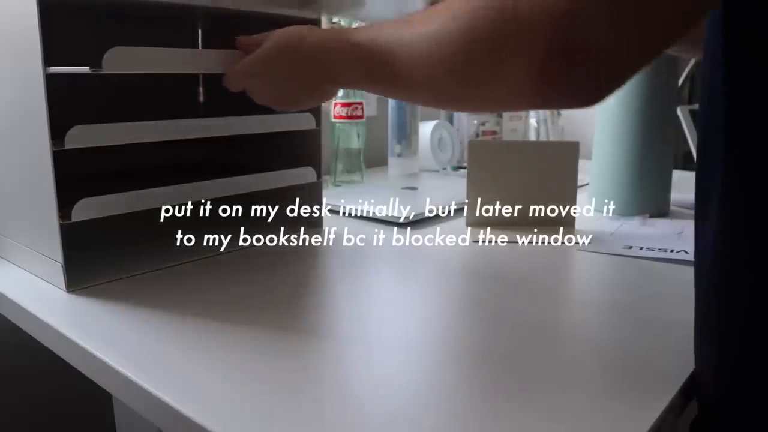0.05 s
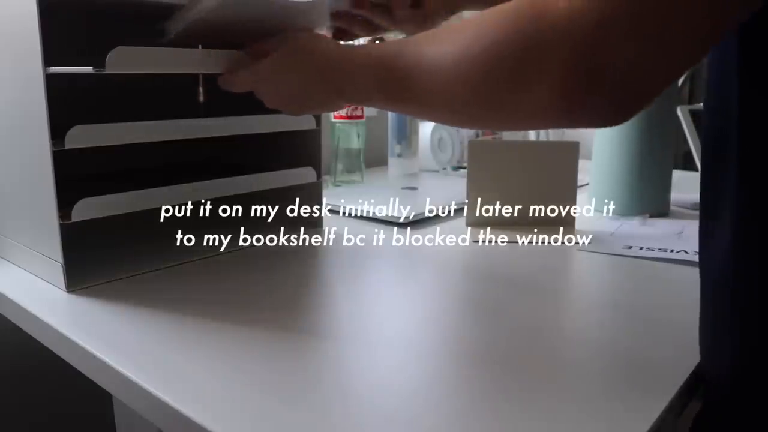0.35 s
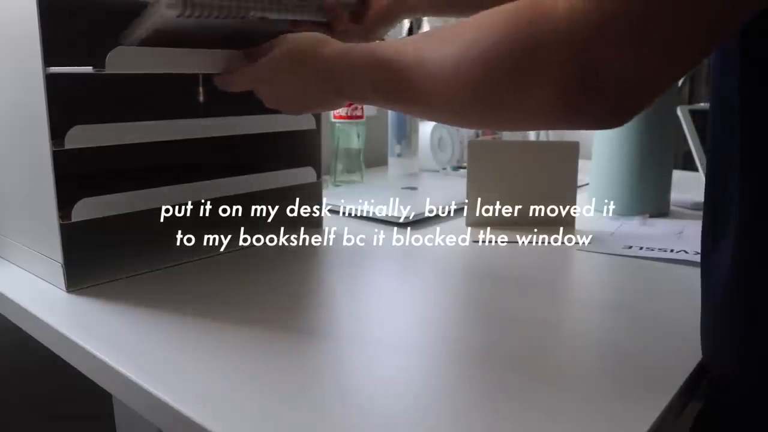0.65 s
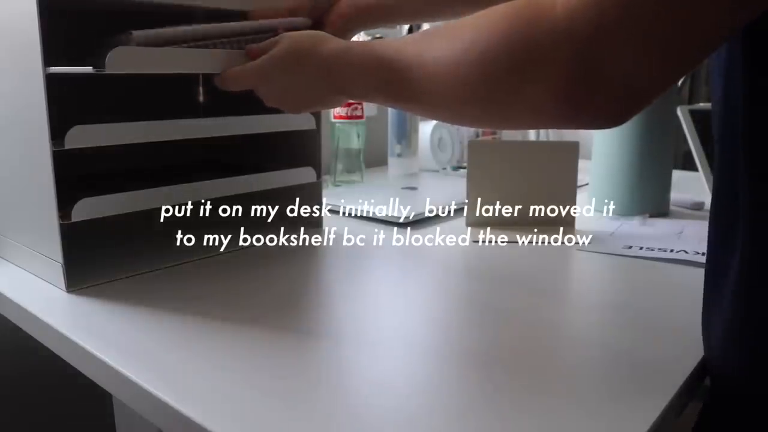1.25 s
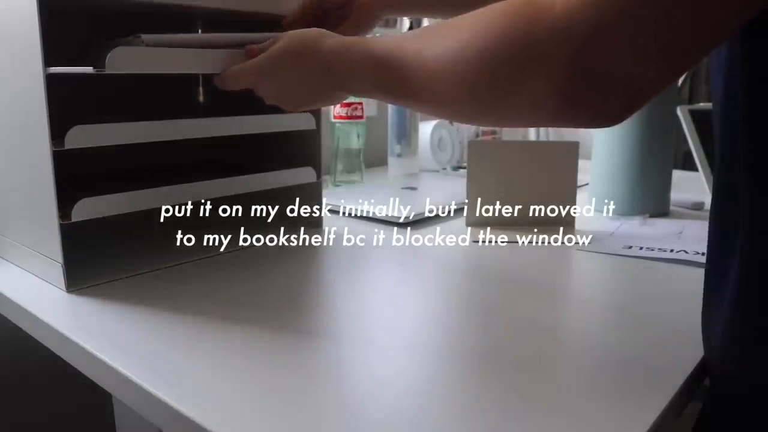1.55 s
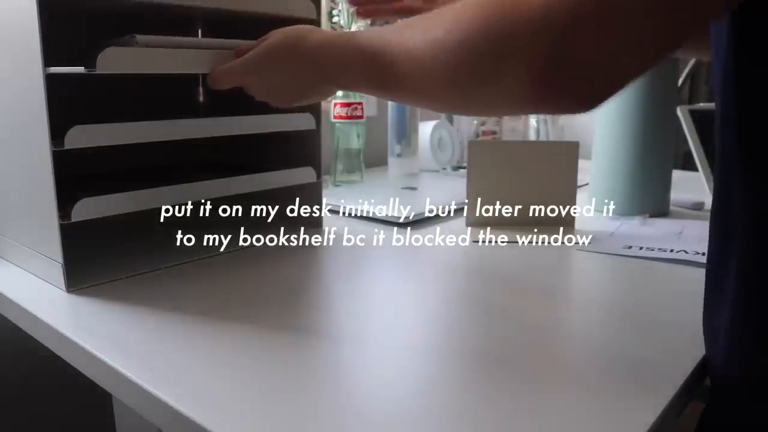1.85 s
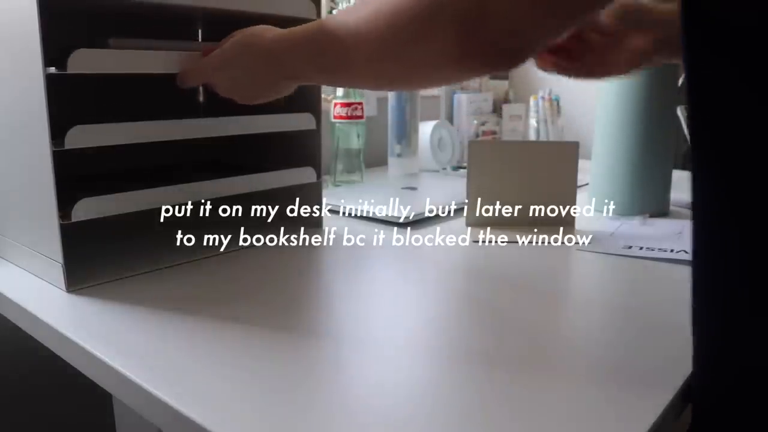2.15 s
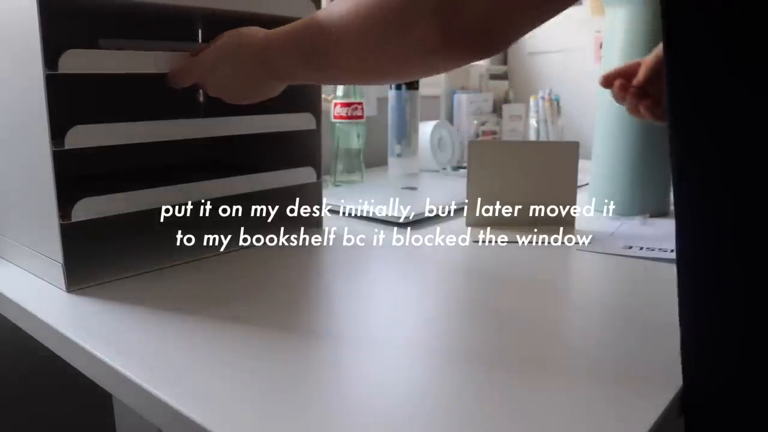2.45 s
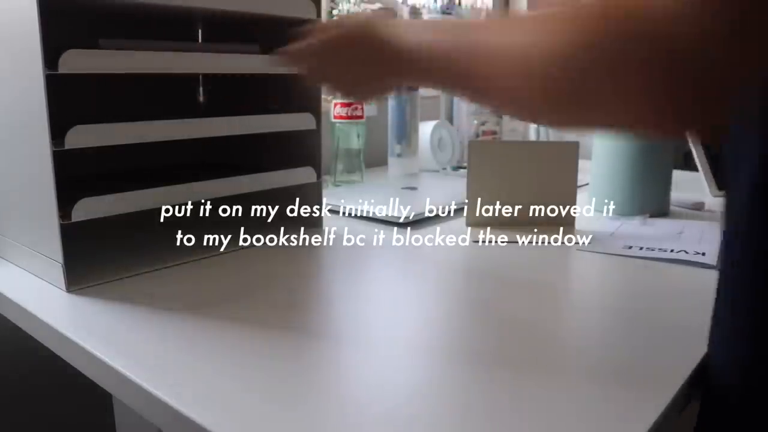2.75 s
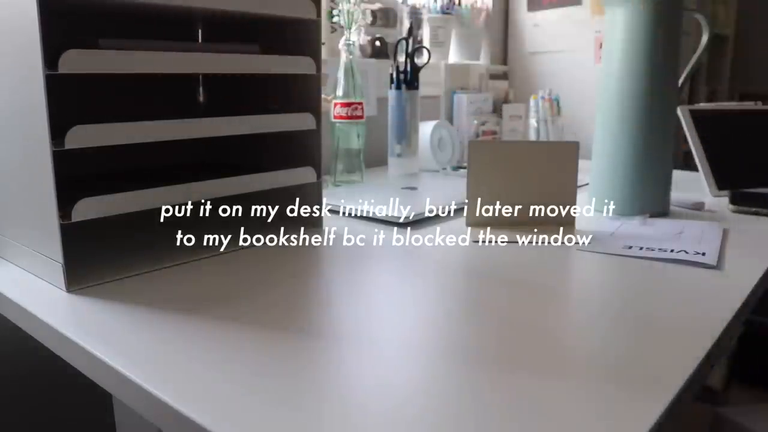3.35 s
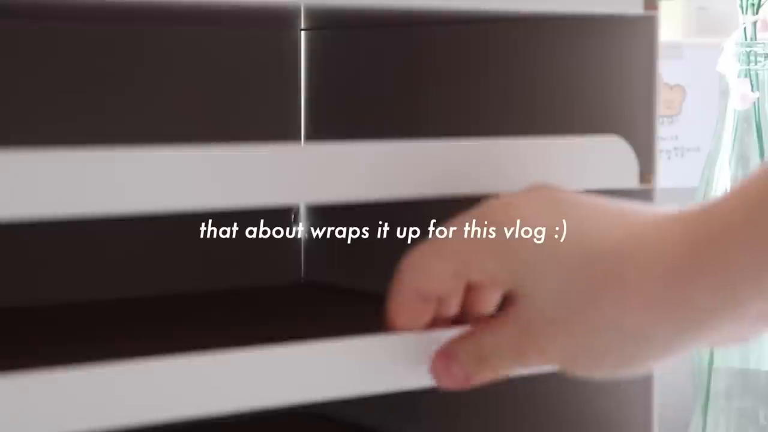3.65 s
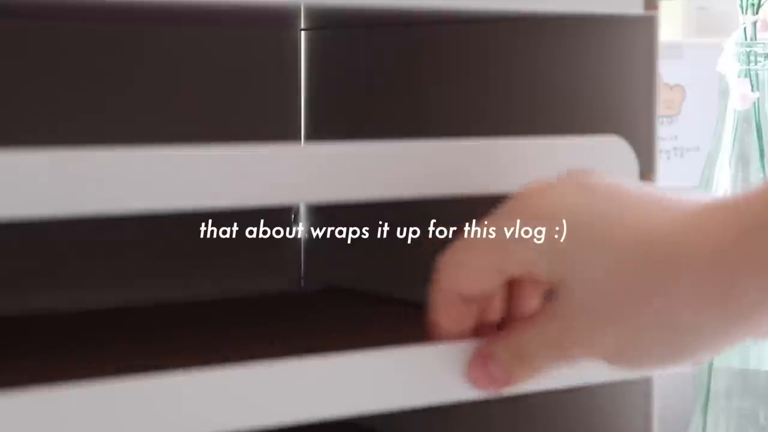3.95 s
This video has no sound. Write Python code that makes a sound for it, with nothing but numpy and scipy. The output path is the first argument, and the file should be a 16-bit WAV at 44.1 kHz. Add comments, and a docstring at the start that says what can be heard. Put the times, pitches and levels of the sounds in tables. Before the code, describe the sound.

A tray scrapes out of a hollow desk organizer. Paper brushes softly, a notebook clacks onto the tray, and it slides shut with a knock. Then a tray slides again, closer, over a faint fan hum in a quiet room.

```python
"""A thin tray is drawn out of a desktop organizer: friction hisses with its speed and rings the hollow case.
A notebook is moved, its binding ticks, paper and sleeve brush past, and it drops on the tray with a clack.
The tray is pushed home with a knock, and there is a faint rumble as the person steps away.
Then, from closer up, a tray is gripped and slid again, chattering on its runners.
All along, a fan hums in the quiet room."""
import sys
import numpy as np
from scipy import signal
from scipy.fft import rfft, irfft
from scipy.io import wavfile
from scipy.ndimage import uniform_filter1d

SR = 44100
rng = np.random.default_rng(int(sys.argv[2]) if len(sys.argv) > 2 else 0)


def pcm_store(signal):
    """Save signal as 16-bit PCM."""
    levels = np.round(np.clip(np.atleast_2d(signal), -1, 1) * 32767)
    wavfile.write(sys.argv[1], SR, levels.astype(np.int16).T)


N = 176400
T, HZ = np.arange(N) / SR, np.maximum(np.arange(N // 2 + 1) * SR / N, 1)
FAR_LAG_S = .000065   # the right microphone hears the far tray later


# Each row: time in seconds, then runner hiss, tray rasp and case drone in dB, before the boosts below.
PULL_LEVELS = [(0.0, -47.5, -34.5, -24.5), (0.024, -50.5, -35, -35.5), (0.136, -58.5, -37.5, -45.5),
               (0.17, -60, -42, -37.5), (0.2, -59, -39.5, -40.5), (0.234, -66, -41, -39),
               (0.36, -89, -62.5, -63)]
# The tone of the rasp. Each row: frequency in Hz, level in dB.
PULL_RASP = [(200, -16), (340, 1), (600, -5.5), (950, -.5), (1400, -9), (2000, -13), (2800, -19),
             (4000, -39)]

def pull_out():
    """The tray starts with a jerk and fades as it slows."""
    return slide(PULL_LEVELS, PULL_RASP, hiss_boost_db=4.0, rasp_boost_db=1.1, drone_boost_db=-2.0,
                 rough_db=0.5, lag_s=FAR_LAG_S / 2, rasp_pan_db=0.5)


# Each row: time in seconds, then hiss, rasp and drone in dB, before the boosts below.
PUSH_LEVELS = [(1.785, -61, -47, -44), (1.84, -46, -39, -35), (1.956, -35.5, -36, -44.5),
               (1.978, -34.5, -33.5, -33.5), (2.085, -35.5, -34.5, -37.5), (2.185, -40, -37, -36.5),
               (2.266, -42.5, -36.5, -42.5), (2.345, -49.5, -35.5, -34.5)]
# Each row: frequency in Hz, level of the rasp in dB.
PUSH_RASP = [(130, -14), (400, 3), (700, -3), (1300, 1.5), (1550, -3), (2000, -0.5), (3000, -9.5),
             (4500, -16)]

def push_home():
    """The loaded tray slides back in, hissing most where it moves fastest."""
    return slide(PUSH_LEVELS, PUSH_RASP, hiss_boost_db=5.0, rasp_boost_db=0.56, drone_boost_db=0.0,
                 rough_db=0.5, lag_s=FAR_LAG_S, rasp_pan_db=0.0)


# Each row: time in seconds, then hiss, rasp and drone in dB, before the boosts below.
CLOSE_LEVELS = [(3.685, -65, -39.5, -30), (3.705, -52, -37.5, -30.5), (3.763, -49, -35, -32.5),
                (3.809, -71, -43.5, -33.5), (3.83, -62, -44, -32.5), (3.865, -47, -34.5, -35),
                (3.919, -42, -32.5, -32.5), (3.951, -39, -33, -23.5), (4.0, -36.5, -36, -23)]
# Each row: frequency in Hz, level of the rasp in dB.
CLOSE_RASP = [(120, -0.5), (440, 3), (600, -4), (780, 3.5), (1400, -2.5), (2100, -3.5), (3100, -9),
              (4500, -20)]

def close_slide():
    """A nearby tray slides, hesitates and slides on, chattering."""
    return slide(CLOSE_LEVELS, CLOSE_RASP, hiss_boost_db=6.0, rasp_boost_db=0.5, drone_boost_db=-3.5,
                 rough_db=0.0, lag_s=0, rasp_pan_db=-0.2, chatters=True)


# The tone of the runners' hiss. Each row: frequency in Hz, level in dB.
RUNNER_HISS = [(1000, -16), (2000, 3.5), (3000, 3), (4300, 0), (5500, -3), (7500, -4), (11000, -8.5),
               (15500, -12)]

def slide(levels, rasp_tone, hiss_boost_db, rasp_boost_db, drone_boost_db,
          rough_db, lag_s, rasp_pan_db, chatters=False):
    """Tiny slips hiss on the runners, rasp in the tray and keep the case droning."""
    times, *curves = np.transpose(levels)
    fade_in_s, release_s = 0.027, 0.034
    fade = np.clip(1 + (T - times[0]) / fade_in_s, 0, 1)
    fade *= np.exp(-np.maximum(T - times[-1], 0) / release_s)
    hiss_gain, rasp_gain, drone_gain = [fade * from_db(np.interp(T, times, db)) for db in curves]
    # Friction varies quickly with the surface, slowly with the hand's pressure.
    grain = unit_power(from_db(rough_db * (drift(rate_hz=250) + drift(rate_hz=34.8))))
    drone = from_db(drone_boost_db) * case_drone()
    if chatters:
        drone = drone + chatter()
    tray = tray_response()
    hiss = from_db(hiss_boost_db) * hiss_gain * noise(colour(RUNNER_HISS) * tray, lag_s=lag_s)
    rasp = from_db(rasp_boost_db) * rasp_gain * noise(colour(rasp_tone) * tray, lag_s=lag_s)
    return grain * (hiss + rasp * pan(rasp_pan_db)) + drone_gain * drone


# The notes at which case and tray ring. Each row: pitch in Hz, relative level in dB when struck,
# the same when rubbed, ring time in seconds (the time to fade by 60 dB, called t60).
CASE_NOTES = [(218.5, -5.5, -3.5, 0.23), (257.5, 2, 1, .22), (276.5, -4, 1, 0.22),
              (341.4, -1.5, -6.5, 0.27), (405, -19, -20, 0.28), (476.3, -11.5, -12.5, 0.31),
              (629, -13.5, -20.5, 0.34), (721, -26, -20.5, 0.19), (915, -30, -17, 0.13),
              (991.4, -5, -17, 0.23), (1292, -15.5, -17.5, 0.33), (1658, -14, -24, 0.21),
              (1896, -13.5, -20.5, 0.2)]

def case_drone():
    """Hundreds of tiny random slips a second keep the hollow case ringing at an even level."""
    slips_per_s, spread_db = 700, 0.5
    slips = (rng.random(N) < slips_per_s / SR) * rng.choice([-1, 1], N)
    slips = slips * from_db(spread_db * rng.standard_normal(N))
    case = cut_bass(sum((-1) ** k * from_db(rubbed_db) * ring(slips, hz, t60)
                        for k, (hz, _, rubbed_db, t60) in enumerate(CASE_NOTES)))
    return case / np.sqrt(uniform_filter1d(case ** 2, size=2000) + 1e-12)


# The pitches the tray favours. Each row: frequency in Hz, width in Hz, lift in dB.
TRAY_PEAKS = [(341, 9.9, 6.5), (711, 23, 7.5), (922.6, 22.5, 10.5), (1387, 44, 5.5), (1988, 57, 6.5),
              (3020, 200, 3.5), (4500, 220, 4.5)]

def tray_response():
    """The tray shapes the friction noise with a few strong resonances among many weak ones."""
    peaks = 1 + sum((from_db(db) - 1) / (1 + (2 * (HZ - hz) / width) ** 2)
                    for hz, width, db in TRAY_PEAKS)
    weak_peaks = unit_power(np.abs(rfft(rng.standard_normal(N) * decay(T, t60=0.19))))
    return peaks * (1 + 0.58 * (weak_peaks - 1))


def chatter():
    """The close tray chatters on its runners at the pitch of the case."""
    start_s, pitch_hz = 3.735, 271.5
    fade_in = np.clip((T - start_s) / 0.027, 0, 1)
    gain = fade_in * from_db(-3 + 2.0 * drift(rate_hz=40))
    return gain * np.sqrt(2) * np.sin(2 * np.pi * pitch_hz * T + .5 * drift(rate_hz=17))


# Each row: start in seconds, crack in dB, frequency in Hz above which crack and echo are dulled,
# crack fade time in seconds, room echo in dB, case ring in dB, thud in dB.
KNOCKS = [(1.6926, -23.5, 4540, 0.031, -50, -35, -53), (1.700, -27.5, 1060, 0.22, -30.5, -46, -22),
          (1.748, -29.5, 650, 0.13, -38, -43, -17.5), (1.792, -30.5, 800, 0.077, -41, -51, -32),
          (2.352, -26.5, 7140, 0.083, -26, -22.5, -14.5), (2.3632, -26, 6040, 0.1, -30, -30.5, -27),
          (2.3822, -30.5, 2500, 0.21, -33.5, -36, -28), (2.443, -48, 1200, 0.049, -40.5, -33.5, -21),
          (3.673, -22.5, 1110, 0.026, -28.5, -36, -5), (3.714, -32, 500, .09, -36, -39, -22)]
# The tones of the crack and of the echo. Each row: frequency in Hz, level in dB.
CRACK_TONE = [(60, -12), (150, 3), (350, -3), (700, 6), (1200, 4.5), (1600, 4.5), (2400, -1), (3400, -6),
              (4200, -12), (6000, -4.5), (10000, -4.5), (15500, -6.5)]
ECHO_TONE = [(60, -4), (130, -4.5), (300, 6), (600, -2), (1100, -2), (2000, -3.5), (3000, -5.5), (5500, -6),
             (9000, -13.5), (15500, -45)]
# Each row: frequency in Hz, seconds the echo takes to fade there.
ECHO_FADE = [(100, 0.38), (400, 0.37), (1200, 0.34), (3000, .23), (7000, 0.2), (14000, 0.13)]

def knocks():
    """Each contact gives a crack, a room echo whose treble dies first, a ring of the case and a thud."""
    bursts, length = np.zeros((2, N + SR)), SR // 2
    t, edges_hz = T[:length], np.geomspace(50, 16000, 13)
    crack_noise = noise(colour(CRACK_TONE), lag_s=FAR_LAG_S)
    echo_noise = noise(colour(ECHO_TONE), lag_s=FAR_LAG_S)
    echo_bands = []
    for k, (low, high) in enumerate(zip(edges_hz, edges_hz[1:])):
        band = (-1) ** k * filtered(echo_noise, 2, [low, high], "band")
        echo_bands.append((band, at_hz(ECHO_FADE, np.sqrt(low * high))))
    for start_s, crack_db, dull_hz, crack_t60, echo_db, _, _ in KNOCKS:
        start, offset = int(start_s * SR), rng.integers(length, N - length)
        piece = slice(offset, offset + length)
        crack = from_db(crack_db) * crack_noise[:, piece] * decay(t, crack_t60)
        echo = from_db(echo_db) * sum(band[:, piece] * decay(t, t60) for band, t60 in echo_bands)
        bursts[:, start:start + length] += filtered(crack + echo, 1, dull_hz, "low")
    starts, *_, ring_db, thud_db = np.transpose(KNOCKS)
    case = sum((-1) ** k * ring(clicks(starts, ring_db + struck_db), hz, t60)
               for k, (hz, struck_db, _, t60) in enumerate(CASE_NOTES))
    thud_hz, attack_s = 252, 0.0022
    thud = (1 - np.exp(-t / attack_s)) * decay(t, t60=0.021) * np.sin(2 * np.pi * thud_hz * t)
    thuds = signal.fftconvolve(clicks(starts, thud_db), thud)[:N]
    return bursts[:, :N] + cut_bass(case) - thuds


def desk_shake():
    """The desk shakes as the tray hits its stop."""
    return ring(clicks(times_s=[2.353], levels_db=[-31]), hz=79, t60=.11)


# The tray's short notes. Each row: pitch in Hz, level in dB, ring time in seconds.
CLACK_NOTES = [(705, -27, 0.085), (1255, -25, 0.051), (2050, -26, 0.02), (2470, -25, 0.021),
               (2780, -32, 0.054), (3520, -31.5, 0.023)]

def notebook_clack():
    """The hard edge of the dropped notebook strikes the tray."""
    return sum((-1) ** k * ring(clicks(times_s=[1.6932], levels_db=[db]), hz, t60)
               for k, (hz, db, t60) in enumerate(CLACK_NOTES))


# Each row: start in seconds, strength of the bump in dB.
CATCHES = [(.075, -40.5), (0.159, -38.5), (.228, -42), (1.828, -38), (1.979, -29.5), (2.131, -30),
           (2.181, -28.5), (2.294, -33.5)]

def catches():
    """The tray catches on its runners and bumps the case; the hand shortens the ringing."""
    bumps, ring_time_share = clicks(*np.transpose(CATCHES)), 0.47
    return cut_bass(sum(from_db(rubbed_db) * ring(bumps, hz, t60 * ring_time_share)
                        for hz, _, rubbed_db, t60 in CASE_NOTES))


def binding_tick():
    """The notebook's binding gives one light, dry tick as it is moved."""
    start_s, centre_hz, width_hz = .5715, 2290, 1700
    envelope = (T >= start_s) * decay(np.abs(T - start_s), t60=.035)
    return from_db(-43.5) * envelope * noise(1 / (1 + (2 * (HZ - centre_hz) / width_hz) ** 2))


# Each row: middle in seconds, half length in seconds, level in dB, treble tilt in dB per octave.
BRUSHES = [(1.248, 0.012, -51, -3), (1.369, 0.043, -50, 1.5), (1.459, 0.032, -49, -1),
           (1.588, 0.12, -53, -1.5), (2.946, 0.11, -57.5, 0), (3.49, 0.044, -54.5, -3)]
# Their shared tone. Each row: frequency in Hz, level in dB.
BRUSH_TONE = [(550, -4), (730, 11.5), (950, 4), (1500, 4.5), (2500, 4.5), (5000, -2), (10000, -4.5),
              (15500, -3.5)]

def brushes():
    """Paper and sleeve swish past in smooth swells."""
    return sum(from_db(db) * swell(middle_s, half_s)
               * noise(colour(BRUSH_TONE) * from_db(tilt * np.log2(HZ)), ROOM_LIKENESS)
               for middle_s, half_s, db, tilt in BRUSHES)


# Each row: time in seconds, level in dB.
RUMBLE_LEVELS = [(2.5, -65), (2.65, -49), (2.9, -48.5), (3.55, -54)]
# Each row: frequency in Hz, level in dB.
RUMBLE_TONE = [(14, -7), (24, 12), (34, -12)]

def rumble():
    """A faint low rumble, mostly on the right, rises while the person steps away."""
    gain = from_db(np.interp(T, *np.transpose(RUMBLE_LEVELS)))
    return gain * noise(colour(RUMBLE_TONE), ROOM_LIKENESS) * pan(-6)


# Each row: pitch in Hz, level in dB, extra dB at the top of the swell, dB more on the left than right.
FAN_TONES = [(61, -59.5, -0.5, -0.5), (116.4, -64, 3, 0.5), (176.2, -61.5, 0.5, -2.5), (244, -62, 1.5, 1.5),
             (347.4, -66, 8, -20.5), (524, -68.5, 8.5, -13)]

def fan():
    """A fan hums with wavering tones that swell early on."""
    early = swell(middle_s=0.66, half_s=0.77)
    hum = 0
    for hz, db, extra_db, pan_db in FAN_TONES:
        gain = from_db(db + extra_db * early + 2.0 * drift(rate_hz=4.2)) * pan(pan_db)
        hum += gain * np.sqrt(2) * np.sin(2 * np.pi * hz * T + 1.09 * drift(rate_hz=3.7))
    return hum


# Each row: frequency in Hz, relative level in dB.
AIR_TONE = [(20, -4.5), (38, -11.5), (58, -15), (85, -22), (125, -12), (250, -13), (600, -19.5),
            (1130, -27.5), (3000, -32), (8000, -37), (15500, -48)]
# Each row: frequency in Hz, how alike left and right are (0 unrelated, 1 the same).
ROOM_LIKENESS = [(30, 0.36), (120, 0.78), (300, 0.57), (700, 0.25), (1500, 0.14), (5000, 0)]

def room_air():
    """The air of the room makes a soft, steady noise."""
    return from_db(-49.5) * noise(colour(AIR_TONE), ROOM_LIKENESS)


# For sounds from the desk. Each row: frequency in Hz, how alike left and right are (0 to 1).
DESK_LIKENESS = [(100, 0.97), (300, 0.92), (750, 0.88), (1400, 0.62), (2700, 0.62), (4600, 0.14),
                 (8000, 0.16), (13000, 0.03)]

def noise(gain, likeness=DESK_LIKENESS, lag_s=0):
    """Stereo noise of power 1, shaped by a gain per frequency; the right side comes lag_s later."""
    mid, side = rfft(rng.standard_normal((2, N)))
    alike = np.clip(at_hz(likeness, HZ), -1, 1)
    mid, side = mid * np.sqrt(1 + alike), side * np.sqrt(1 - alike)
    left, right = mid + side, (mid - side) * np.exp(-2j * np.pi * HZ * lag_s)
    return unit_power(irfft(gain * np.array([left, right]), N))


def colour(points):
    """Turn a tone table into a gain per frequency, falling away beyond its ends."""
    roll_off = np.minimum(HZ / points[0][0], 1) ** 2 * np.minimum(points[-1][0] / HZ, 1) ** 2
    return from_db(at_hz(points, HZ)) * roll_off


def at_hz(points, hz):
    """Read between the rows of a table, with octaves evenly spaced."""
    frequencies, values = np.transpose(points)
    return np.interp(np.log(hz), np.log(frequencies), values)


def clicks(times_s, levels_db):
    """One-sample taps at the given times."""
    out = np.zeros(N)
    np.add.at(out, np.clip((np.asarray(times_s) * SR).astype(int), 0, N - 1), from_db(levels_db))
    return out


def ring(force, hz, t60):
    """A click of height 1 starts a fading sine of height 1."""
    keep, angle = from_db(-60 / (t60 * SR)), 2 * np.pi * hz / SR
    return signal.lfilter([0, np.sin(angle)], [1, -2 * keep * np.cos(angle), keep * keep], force + 1e-18)


def cut_bass(x):
    """Cut the deep bass below about 150 Hz from the case's ringing."""
    return filtered(x, 2, hz=147, kind="high")


def filtered(x, order, hz, kind):
    """Keep the lows, the highs or a band."""
    return signal.sosfilt(signal.butter(order, hz, kind, fs=SR, output="sos"), x)


def decay(t, t60):
    """Fade by 60 dB every t60 seconds."""
    return np.exp(-np.log(1000) * t / t60)


def swell(middle_s, half_s):
    """A bell-shaped rise and fall."""
    return np.exp(-.5 * ((T - middle_s) / half_s) ** 2)


def drift(rate_hz):
    """Random wander of typical size 1, up to about the given rate."""
    return unit_power(irfft(rfft(rng.standard_normal(N)) / (1 + (HZ / rate_hz) ** 2), N))


def pan(db):
    """Left and right gains; positive dB favours the left."""
    return from_db(np.array([[.5], [-.5]]) * db)


def from_db(db):
    """Decibels to gain."""
    return 10 ** (np.asarray(db) / 20)


def unit_power(x):
    """Scale to an average power of 1."""
    return x / np.sqrt(np.mean(x ** 2) + 1e-20)


def scene():
    """Three slides with their knocks and handling sounds, over the room."""
    slides = pull_out() + push_home() + close_slide()
    contacts = knocks() + desk_shake() + notebook_clack() + catches()
    return slides + contacts + brushes() + rumble() + binding_tick() + fan() + room_air()


# Each row: frequency in Hz, dB more on the left than right.
MIC_BALANCE = [(300, 0.5), (700, 1.3), (2500, -1.5), (5000, 0.5), (9000, 1.5), (13000, -2.5)]

def record(dry):
    """Each microphone has its own tone, and the highest treble is cut steeply."""
    hz, cutoff_hz = np.maximum(np.arange(N + 1) * SR / (2 * N), 1), 15750
    treble_cut = 1 / np.sqrt(1 + (hz / cutoff_hz) ** 300)
    return irfft(rfft(dry, 2 * N) * pan(at_hz(MIC_BALANCE, hz)) * treble_cut)[:, :N]


dry = scene()
out = record(dry)
pcm_store(out)
```